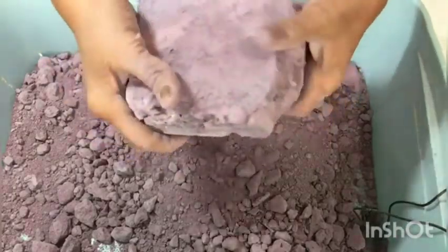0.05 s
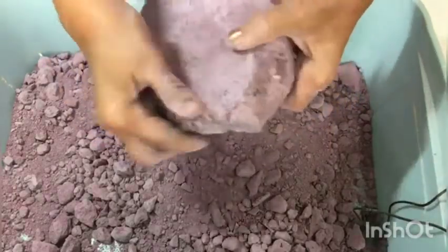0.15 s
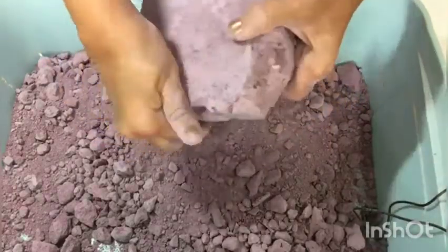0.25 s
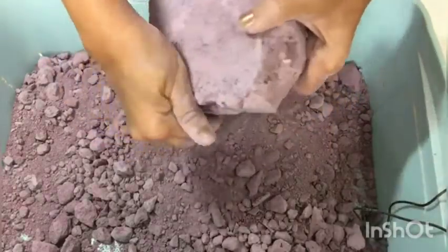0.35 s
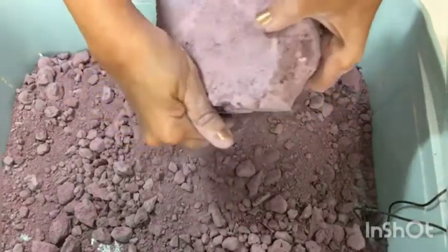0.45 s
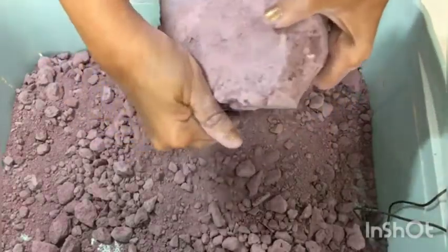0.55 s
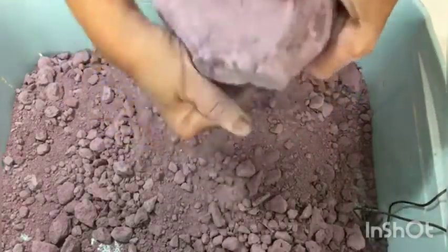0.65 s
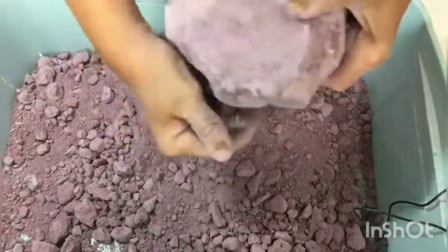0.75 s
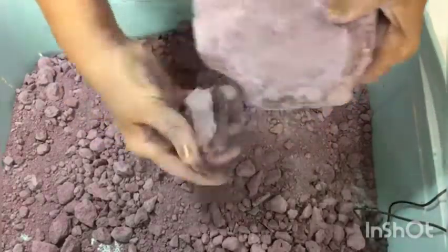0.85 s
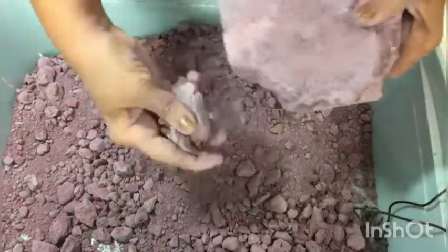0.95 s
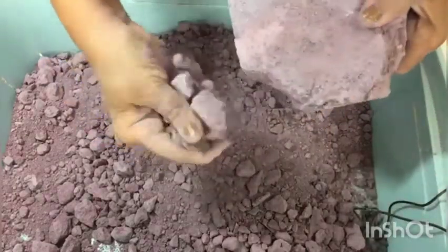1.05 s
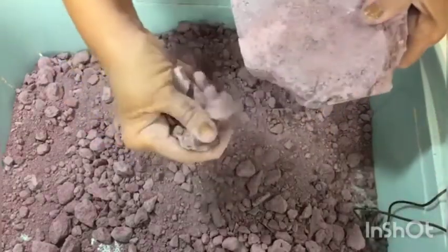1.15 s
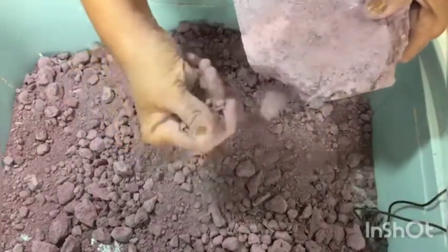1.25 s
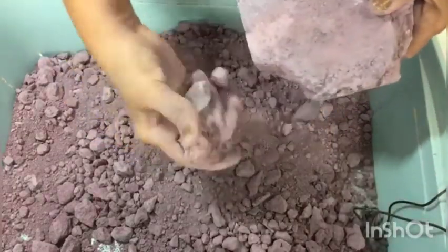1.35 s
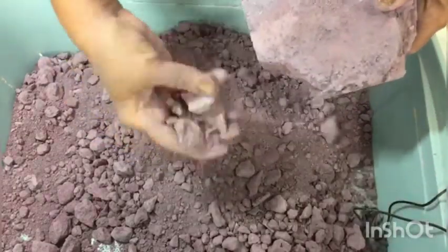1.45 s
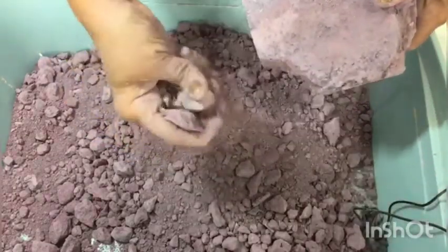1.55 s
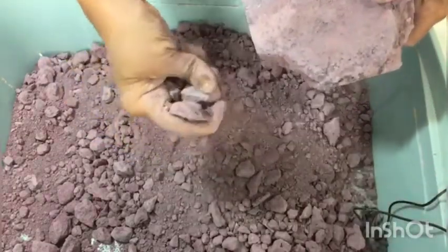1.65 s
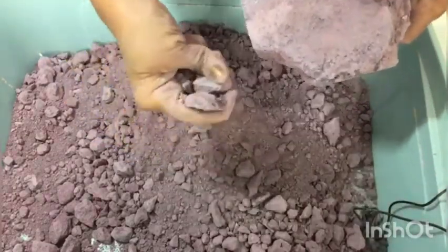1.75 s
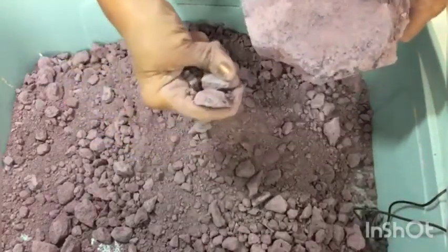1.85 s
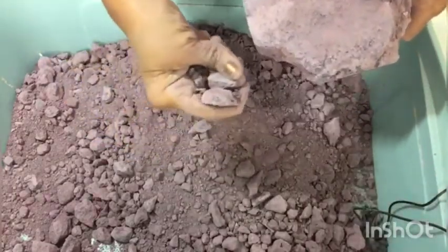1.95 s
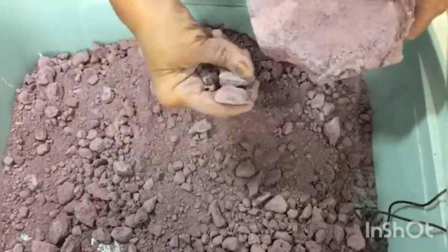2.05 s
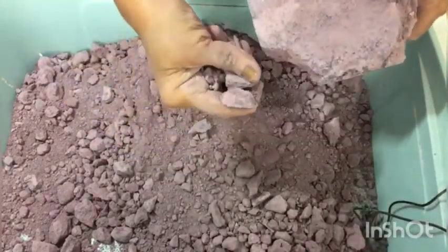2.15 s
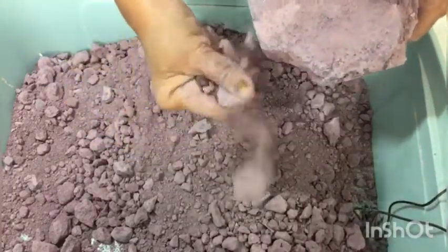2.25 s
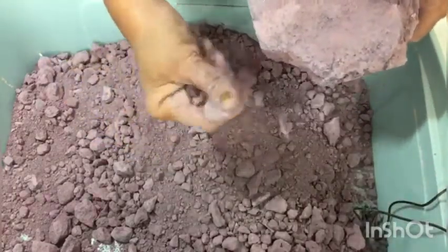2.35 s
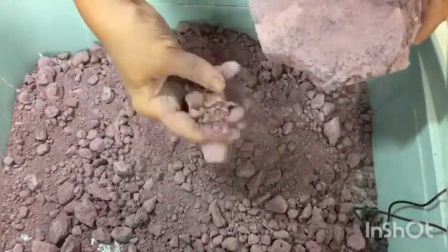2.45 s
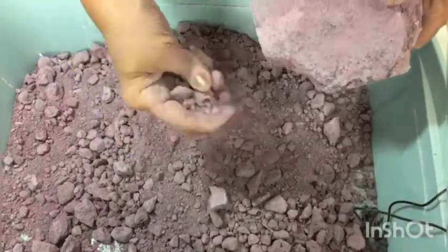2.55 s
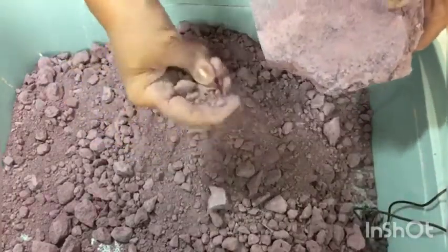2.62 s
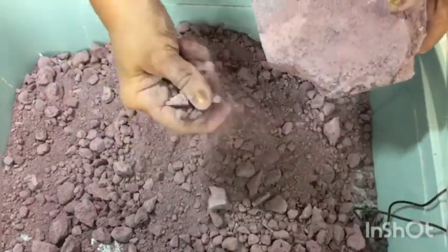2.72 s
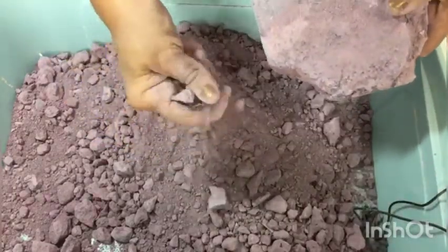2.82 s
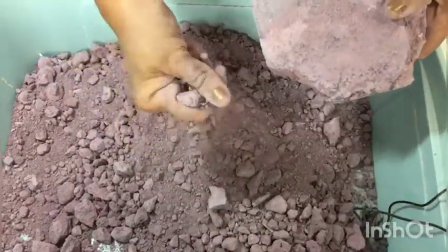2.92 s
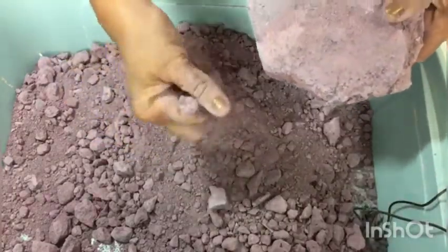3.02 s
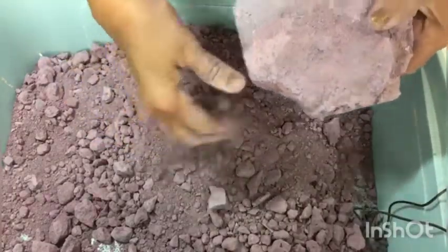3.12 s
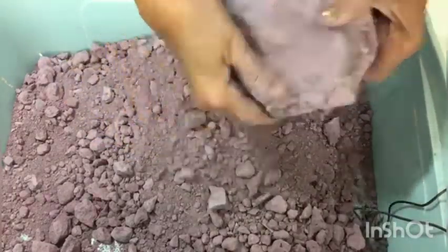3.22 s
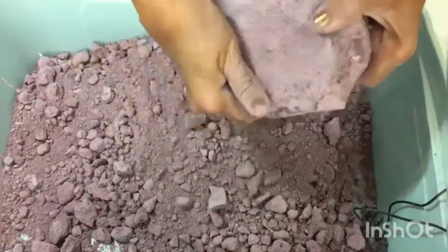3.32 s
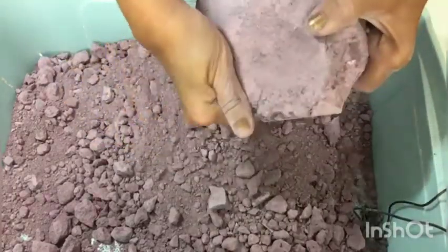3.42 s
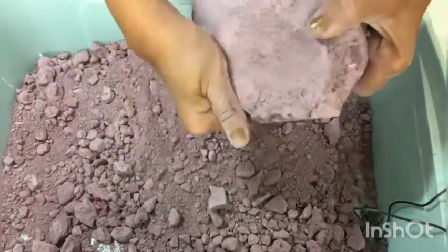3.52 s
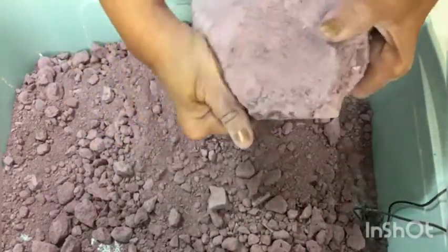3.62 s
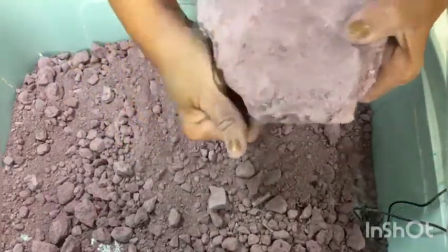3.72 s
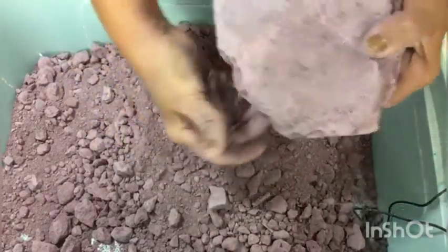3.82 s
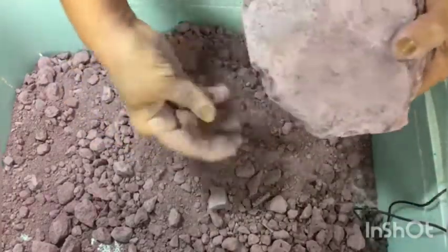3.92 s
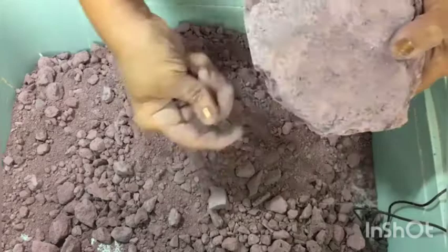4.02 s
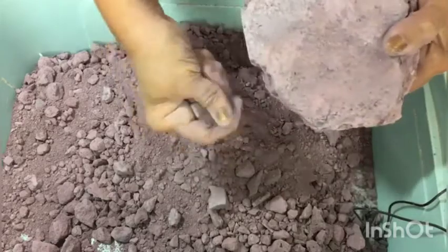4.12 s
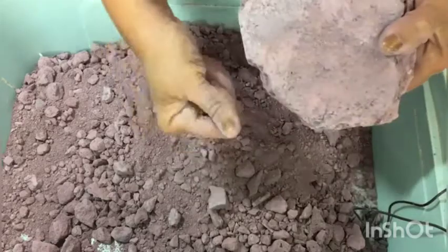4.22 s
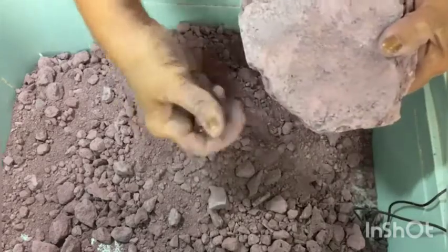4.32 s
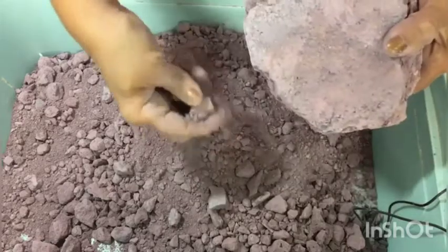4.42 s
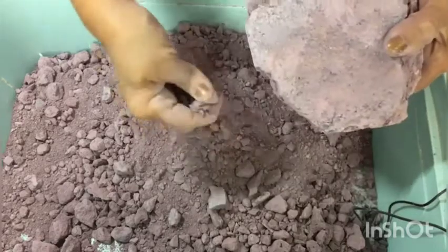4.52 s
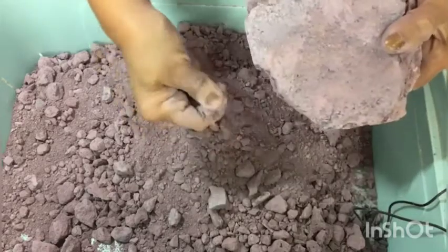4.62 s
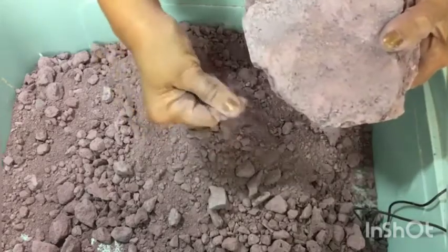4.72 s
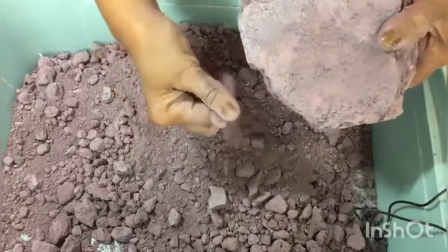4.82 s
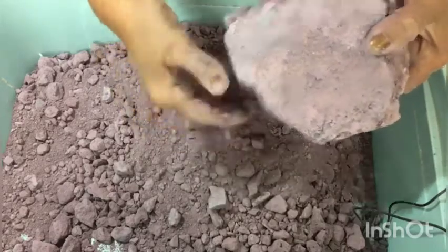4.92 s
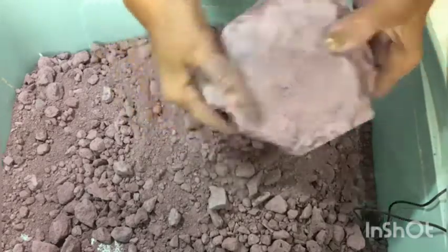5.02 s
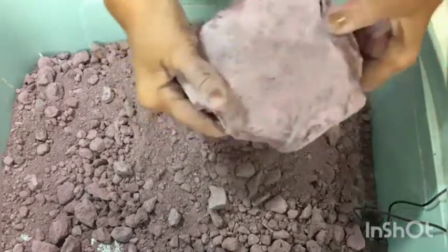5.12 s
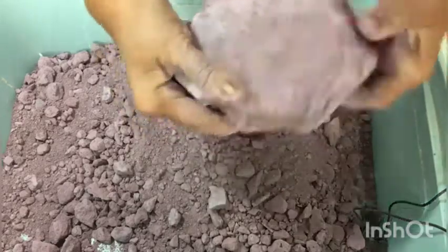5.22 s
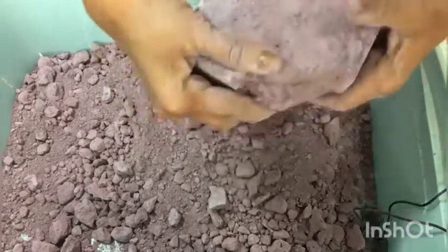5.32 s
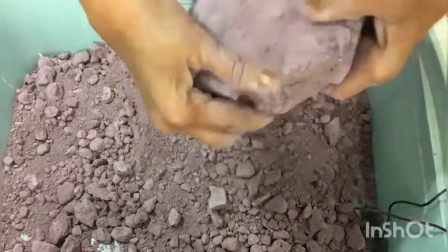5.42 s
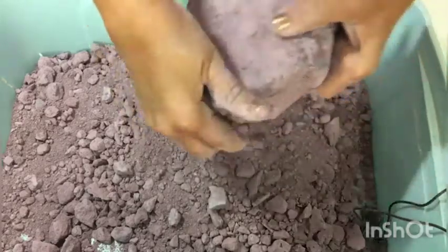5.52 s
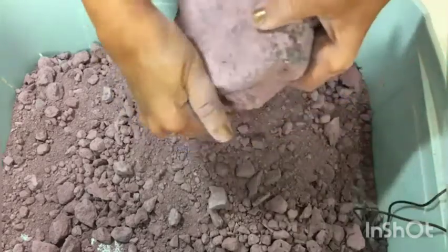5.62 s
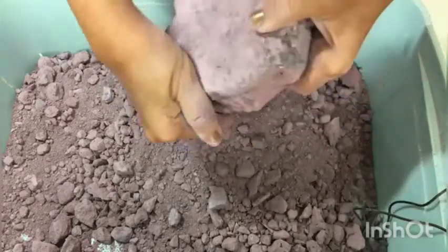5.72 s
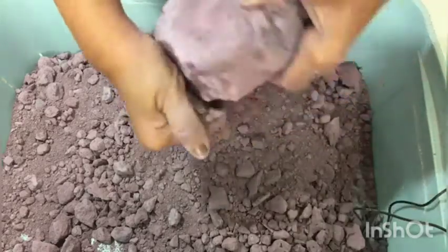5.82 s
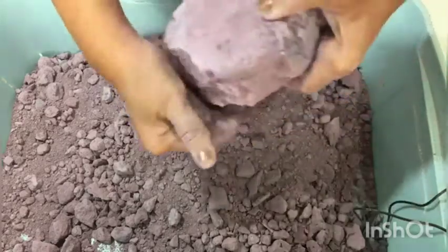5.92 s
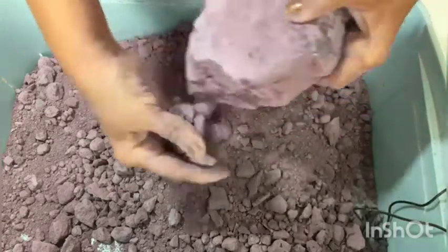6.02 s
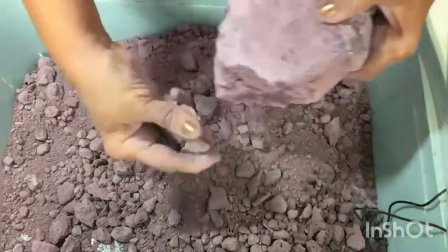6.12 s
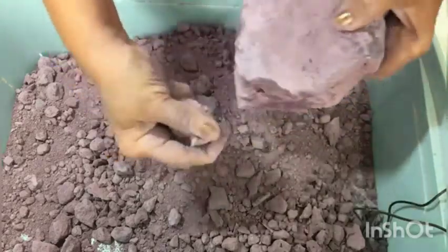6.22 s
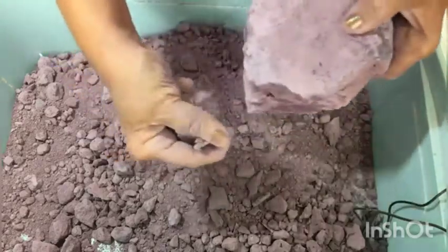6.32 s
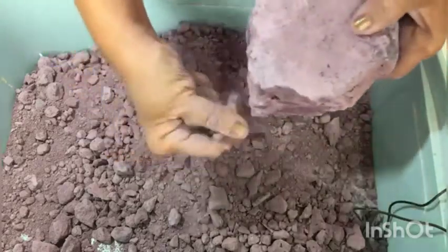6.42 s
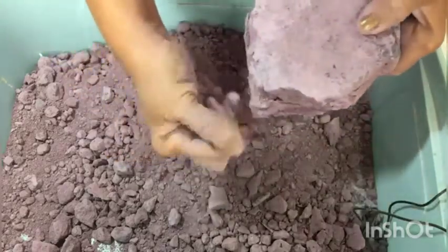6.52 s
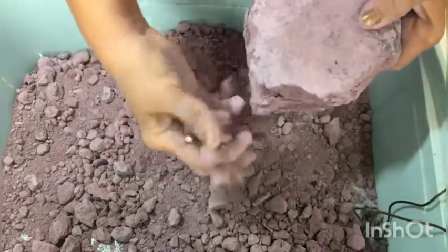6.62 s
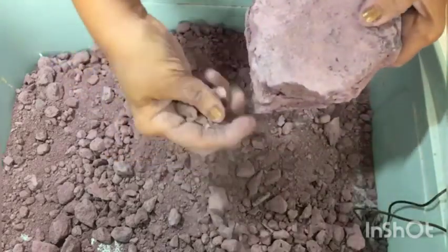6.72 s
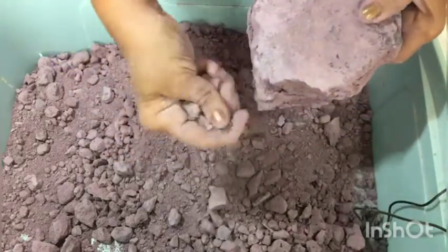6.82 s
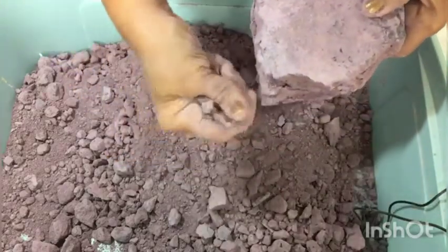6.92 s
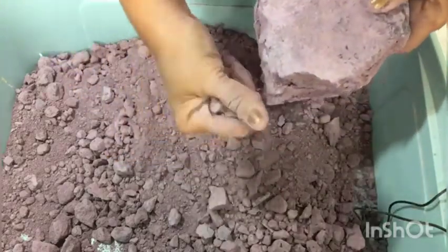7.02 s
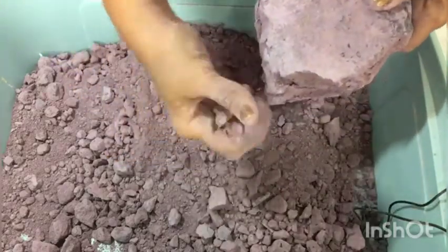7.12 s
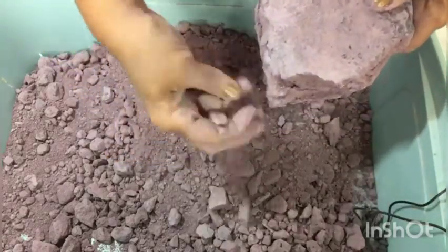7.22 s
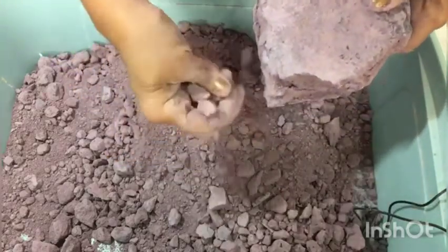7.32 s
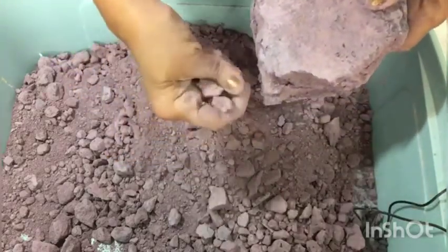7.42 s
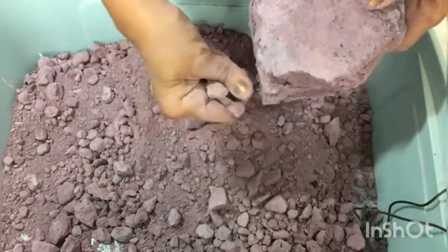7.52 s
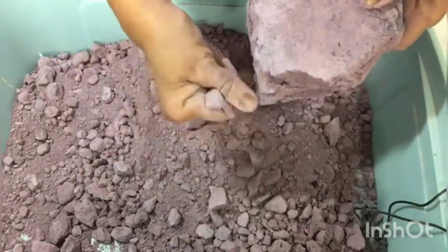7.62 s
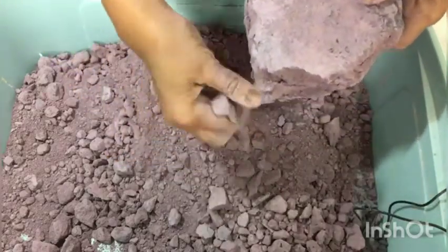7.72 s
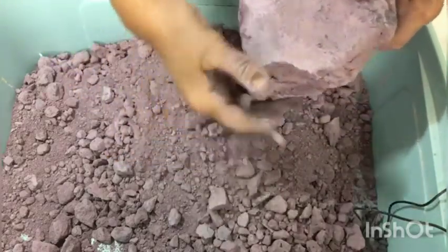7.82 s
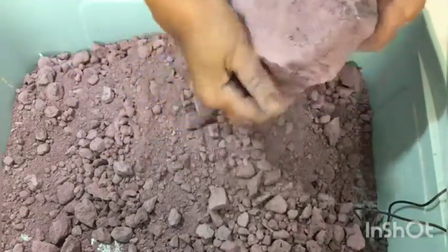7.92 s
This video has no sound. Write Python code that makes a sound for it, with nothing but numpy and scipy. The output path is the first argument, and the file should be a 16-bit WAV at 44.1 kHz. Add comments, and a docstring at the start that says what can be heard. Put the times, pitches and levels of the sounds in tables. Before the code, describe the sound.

Close, dry chalk crunching and snapping in the hands, crumbs raining into a plastic tub, with one very loud distorted lump impact at 2.3 seconds.

```python
"""Hands break and crumble a dry chalk block over a plastic tub, close to a one-microphone phone, for eight seconds.
From the start, noise grains rub and patter, and noise bursts crack and knock; lumps roll in narrow bands.
Near 2.3 s a heavy lump shocks the ringing tub and overloads the phone, and slow tub modes boom.
From 4.4 to 4.8 s a fingertip scratches a lump; cracks and crumbs go on to the end.
Throughout, the stand sways below hearing (narrow slow noise) and a quiet room hums (coloured noise)."""
import sys
import numpy as np
from scipy import signal
from scipy.fft import rfft, irfft
from scipy.io import wavfile
from scipy.ndimage import uniform_filter1d

SR = 44100
rng = np.random.default_rng(int(sys.argv[2]) if len(sys.argv) > 2 else 0)


def dump(signal):
    """Clip the signal to [-1, 1] and save it as 16-bit WAV at the path in sys.argv[1]."""
    limited = np.clip(np.atleast_2d(signal).T, -1, 1)
    pcm = np.round(limited * 32767).astype(np.int16)
    wavfile.write(sys.argv[1], SR, pcm)


N = 351036  # length in samples

# Broad resonances of the plastic tub. Each row: centre in Hz, width in Hz, relative level in dB.
TUB_BODY = [(83, 55.6, 1.5), (141, 57, 4), (223, 134, 0.5), (331.6, 242, -7.5)]


def undb(db):
    """Decibels to gain."""
    return 10 ** (np.asarray(db) / 20)


def unit(x):
    """Scaled to rms 1."""
    return x / np.sqrt(np.mean(x ** 2))


def peaked(x, db):
    """Scaled to a peak level in dB."""
    return undb(db) * x / np.abs(x).max()


def fade(t, t60):
    """Exponential decay, 60 dB in t60 seconds (never under 2 ms)."""
    return np.exp(-np.log(1000) * t / max(t60, .002))


def resonance(x, hz, width_hz):
    """Two-pole band-pass, gain 1 at the centre."""
    b, a = signal.iirpeak(hz, hz / width_hz, fs=SR)
    return signal.lfilter(b, a, x)


def steep(x, hz, width_hz):
    """A resonance applied twice, for dark flanks."""
    return resonance(resonance(x, hz, width_hz), hz, width_hz)


def body(x, modes):
    """Sum of broad resonances of alternating sign."""
    total = 0
    for k, (hz, width_hz, db) in enumerate(modes):
        total = total + (-1) ** k * undb(db) * resonance(x, hz, width_hz)
    return total


def add(out, s, sound):
    """Mixes a sound in at time s."""
    i = int(s * SR)
    out[i:i + len(sound)] += sound[:len(out) - i]


def walk(rate):
    """Random levels held 1 / rate s and slewed twice; spread near 1."""
    hold = int(SR / rate)
    steps = np.repeat(rng.standard_normal(N // hold + 1), hold)
    slewed = uniform_filter1d(uniform_filter1d(steps, hold), hold)
    return 1.25 * slewed[:N]


def grains(rate, spread_db, smear_s, patchy_db):
    """Random ticks of uneven size, rate per second, each smeared into a short noise puff; they come in patches."""
    size_db = spread_db * np.minimum(rng.exponential(size=N), 4)
    ticks = (rng.random(N) < rate / SR) * undb(size_db)
    puffs = signal.lfilter([1], [1, -np.exp(-1 / (smear_s * SR))], ticks)
    return puffs * rng.standard_normal(N) * undb(patchy_db * walk(25))


def with_bursts(steady_db, bursts):
    """Level in dB of a steady layer plus bursts (s, hold s, dB) that rise, hold and die away."""
    attack_s, release_t60_s = 0.013, 0.19
    t = np.arange(N) / SR
    power = undb(2 * steady_db)
    for s, hold, db in bursts:
        rise = np.clip((t - s) / attack_s, 0, 1)
        release = fade(np.maximum(t - s - attack_s - hold, 0), release_t60_s)
        power = power + (undb(db) * rise * release) ** 2
    return 10 * np.log10(power)


def snaps():
    """Each snap or landing: a gritty crack, the dry knock of the lump and a soft push into the tub."""
    # Each row: start in seconds, crack peak in dB, crack pitch in Hz, crack t60 in seconds,
    # knock peak in dB, knock pitch in Hz, thump peak in dB.
    snap_rows = [(0.079, -15.5, 6930, 0.36, -30, 1380, -46), (0.311, -20, 2600, 0.16, -21, 580, -35),
                 (0.3219, -14, 2440, 0.046, -15.5, 1300, -24.5), (0.416, -43, 2280, 0.031, -16, 2070, -44),
                 (0.4763, -17, 2170, 0.08, -14.5, 1260, -22), (0.5852, -9.5, 2160, 0.14, -8, 620, -11.5),
                 (0.6032, -19, 2230, .046, -15.5, 620, -21), (0.8904, -39, 6780, .046, -26.5, 670, -55),
                 (1.034, -28, 3880, 0.21, -29, 845, -36), (1.2058, -16.5, 2360, .046, -14.5, 700, -27.5),
                 (1.2872, -22, 1990, .04, -16, 1260, -30), (1.299, -14.5, 3940, 0.037, -10.5, 861, -18),
                 (1.3777, -23, 6650, 0.08, -9.5, 576, -19), (1.4204, -22.5, 4090, 0.15, -23, 755, -40),
                 (1.44, -27, 5450, 0.17, -21, 710, -26), (1.551, -22, 6710, 0.11, -46, 553, -27),
                 (1.625, -21, 6480, 0.015, -41, 495, -44), (1.722, -25.5, 1880, 0.035, -26, 640, -49),
                 (1.8827, -14.5, 5900, 0.034, -22.5, 606, -24),
                 (2.1727, -13, 5910, 0.11, -15.5, 1160, -22.5),
                 (2.2317, -32, 4700, 0.066, -24.5, 1380, -27), (2.279, 12.5, 2030, 0.067, 13, 1220, -11),
                 (2.3313, -1.5, 2060, 0.05, -6, 520, 1), (2.408, -18, 2480, .024, -26, 526, -22),
                 (2.43, -21, 2020, 0.052, -34, 664, -13), (2.4491, -23, 2000, 0.045, -0.5, 1000, -6),
                 (2.497, 3.5, 2220, 0.014, -0.5, 1170, -17), (2.5147, -12.5, 2050, 0.027, -23, 670, -10),
                 (2.5563, -40, 2090, .04, -16.5, 493, -25), (2.5695, 1.5, 3130, 0.015, -18, 1250, -28),
                 (2.6469, -17, 2120, 0.028, -9.5, 1090, -30), (2.659, -19.5, 3810, 0.1, -30, 1300, -34),
                 (2.7476, -19.5, 4170, 0.078, -23, 1820, -30), (2.823, -20.5, 3670, 0.062, -33, 506, -27),
                 (2.9878, -30, 2070, 0.046, -23.5, 1750, -45), (3.029, -24.5, 2010, 0.051, -21.5, 775, -44),
                 (3.0444, -28, 2604, 0.098, -18.5, 1360, -21.5),
                 (3.175, -21.5, 6690, 0.038, -29, 659, -27.5), (3.2117, -20, 5400, 0.033, -19, 485, -15),
                 (3.2267, -20, 3890, 0.03, -24, 880, -12), (3.264, -27, 2870, .04, -7.5, 1080, -32),
                 (3.2897, -6.5, 4400, 0.024, -9.5, 1670, -25), (3.2975, -18, 2100, 0.041, -7.5, 487, -26),
                 (3.33, -20, 5200, 0.026, -23, 506, -29), (3.3686, -21, 2010, .075, -29, 646, -28),
                 (3.4193, -29, 2030, 0.033, -17.5, 600, -23), (3.4441, -22, 2540, 0.054, -24, 478, -31),
                 (3.5088, -13.5, 2620, 0.15, -17.5, 830, -28), (3.5181, -2.5, 2240, 0.051, -32, 1360, -18),
                 (3.6396, -13, 4730, 0.19, -23, 800, -38), (4.0264, -22, 5930, 0.023, -32, 876, -37.5),
                 (4.052, -16.5, 4730, 0.014, -43, 720, -50), (4.5902, -23, 4100, .1, -35, 476, -30),
                 (4.669, -15, 3940, 0.056, -40, 528, -53), (4.783, -28, 3660, 0.087, -34.5, 1210, -32.5),
                 (4.798, -16, 1980, 0.025, -8.5, 790, -18.5), (4.9167, -26, 2150, 0.058, -25, 554, -20),
                 (4.9667, -29, 2280, 0.085, -32, 673, -23), (5.1061, -16.5, 4900, .054, -14.5, 850, -26),
                 (5.143, -22.5, 6370, 0.059, -21, 522, -42), (5.169, -43, 2120, 0.033, -13.5, 830, -44),
                 (5.2372, -31, 7000, .04, -21.5, 510, -45), (5.181, -32.5, 3820, .03, -38, 665, -48),
                 (5.2932, -23.5, 2850, 0.044, -45, 560, -50), (5.3076, -15, 5370, 0.012, -26.5, 540, -41),
                 (5.35, -10.5, 6700, 0.23, -35, 550, -26), (5.6355, -25.5, 2000, 0.049, -19, 1290, -47),
                 (5.7087, -12.5, 2450, 0.1, -32, 1290, -15), (5.7161, -0.5, 2480, 0.072, -12, 1290, -22),
                 (5.7283, -11, 2710, .029, -19, 1950, -21), (5.7502, -25, 3560, .046, -27, 791, -32),
                 (5.858, -27, 5500, 0.046, -32, 1110, -43), (6.0882, -25.5, 2120, .095, -33.5, 767, -33),
                 (6.2646, -27, 2500, 0.041, -34, 646, -40), (6.0163, -30, 2550, 0.035, -29, 584, -25),
                 (6.2281, -19, 3370, 0.021, -23.5, 1830, -44), (6.3837, -27, 4480, 0.045, -19, 610, -24),
                 (6.396, -17.5, 5610, 0.021, -16, 1000, -24), (6.4571, -19.5, 2030, 0.023, -24, 1210, -35),
                 (6.641, -23, 2020, .04, -13, 840, -19.5), (6.7004, -40.5, 2010, .035, -14.5, 1230, -13.5),
                 (6.7565, -26.5, 3750, 0.13, -28, 490, -12.5), (6.8025, -40, 2580, .04, -31.5, 900, -33),
                 (7.01, -27.5, 2700, 0.25, -31, 654, -42), (7.1697, -17, 5700, 0.011, -29.5, 674, -31),
                 (7.2348, -16.5, 2060, 0.03, -17.5, 533, -14),
                 (7.2916, -36, 2020, 0.052, -10.5, 1250, -16.5), (7.3538, -34, 2020, .04, -29, 482, -13.5),
                 (7.3915, -17, 4700, 0.033, -25, 580, -20.5), (7.4908, -27, 6670, .04, -23.5, 518, -21.5),
                 (7.5096, -26.5, 3170, .032, -32, 1370, -37), (7.5516, -25.5, 2030, 0.13, -20.5, 1320, -35),
                 (7.639, -29.5, 3490, 0.065, -24, 855, -26), (7.746, -18.5, 5750, .034, -32, 910, -27),
                 (7.788, -21.5, 2030, 0.092, -26, 1220, -33), (7.8185, -14.5, 3180, 0.09, -32, 1400, -28),
                 (7.879, -26, 4870, .069, -31, 514, -26), (7.9304, -2, 5700, 0.029, -17, 1080, -35)]
    crack_q, knock_q = 0.49, 1.5
    head_db, head_t60, rise_share = 6, 0.0047, 0.011
    knock_t60, blow_db, blow_delay_s, push_s = .035, 25, 0.00073, 0.0016
    out, t = np.zeros(N), np.arange(SR // 6) / SR
    chance = rng.standard_normal((len(snap_rows), 3, len(t)))

    push = np.sin(np.pi * np.minimum(t / push_s, 1)) ** 2
    thump = body(push * (t < push_s), TUB_BODY)
    head = undb(head_db) * fade(t, head_t60)  # the first contact is the sharpest
    blow = undb(blow_db) * (np.arange(len(t)) == int(blow_delay_s * SR))  # one-sample click
    for row, (hiss, dull, grit) in zip(snap_rows, chance):
        s, crack_db, crack_hz, t60, knock_db, knock_hz, thump_db = row
        rise = 1 - np.exp(-t / (rise_share * t60))  # long crunches also build up slowly
        # the break runs on as smaller splinters, so the tail is grainy
        tail = fade(t, t60) * undb(12.3 * uniform_filter1d(grit, size=16))
        splinters = hiss * rise * (head + tail)
        crack = steep(splinters, crack_hz, crack_hz / crack_q)
        crack = crack + 0.13 * np.diff(splinters, prepend=0)  # bright edge
        struck = blow * np.sign(dull[0]) + dull * fade(t, knock_t60)
        knock = steep(struck, knock_hz, knock_hz / knock_q)
        add(out, s, peaked(crack, crack_db) + peaked(knock, knock_db) + peaked(thump, thump_db))
    return out


def heavy_drop():
    """Each blow shocks the tub, the heap keeps shaking it, and the whole tub booms a moment later."""
    # The heavy lump and its rebounds. Each row: start in seconds, blow gain in dB.
    blows = [(2.279, 19.5), (2.288, 15), (2.298, 4.5), (2.315, 1.5)]
    # Where the loaded tub and heap answer. Each row: centre in Hz, width in Hz,
    # peak in dB before the blow gain, t60 of the shaking in seconds.
    tub_ring = [(175, 70, -11, .1), (240, 90, -9, .1), (340, 80, -7, .1), (500, 150, -10, .17),
                (850, 350, -10, .17), (1200, 450, -8, .14)]
    # Slowest tub modes, rung once. Each row: pitch in Hz, starting level in dB, t60 in seconds.
    tub_boom = [(46, -2, .6), (86, -5, .3)]
    shock_db, boom_s = 24, 2.31
    out, t = np.zeros(N), np.arange(SR // 2) / SR
    chance = rng.standard_normal((len(blows), len(t)))
    chance[:, 0] = undb(shock_db)  # the shock is the first sample
    for (s, blow_db), shaking in zip(blows, chance):
        ring = 0
        for hz, width_hz, db, t60 in tub_ring:
            ring = ring + peaked(steep(shaking * fade(t, t60), hz, width_hz), db)
        add(out, s, undb(blow_db) * ring)
    boom = sum(undb(db) * np.sin(2 * np.pi * hz * t) * fade(t, t60) for hz, db, t60 in tub_boom)
    add(out, boom_s, boom)
    return out


def rolling():
    """Quick small bumps ring whichever part of tub or heap the lump rolls or grinds over, in one narrow band."""
    # Each row: start in seconds, hold in seconds, level in dB, pitch in Hz.
    roll_rows = [(1.297, .01, -23, 94), (1.413, 0.074, -36.5, 800), (2.446, 0.022, -24.5, 1193),
                 (3.037, .03, -26, 102.5), (4.795, 0.011, -21, 109.6), (4.904, 0.11, -28, 118.3),
                 (5.107, 0.018, -35, 1094), (5.7, 0.0077, -20.5, 2570), (6.695, 0.013, -24.5, 96.6),
                 (6.754, 0.032, -25.5, 190.7), (7.232, 0.014, -28, 281), (7.283, .04, -31, 93.6)]
    roll_q = 5.6
    bumps = grains(700, spread_db=0.5, smear_s=0.0025, patchy_db=2.0)
    silent_db = np.full(N, -120.)
    total = np.zeros(N)
    for s, hold, db, hz in roll_rows:
        level_db = with_bursts(silent_db, [(s, hold, db)])
        total += undb(level_db) * unit(steep(bumps, hz, hz / roll_q))
    return total


def crumbling(grit_db, dust_db, crumb_db, drum_db):
    """Grit and dust swish between the fingers, crumbs rustle on the heap, and their rain drums the tub."""
    # Bands of the coarse grit, fine dust and heap. Each row: centre in Hz, width in Hz, relative level in dB.
    grit_bands = [(2350, 1560, 4), (3935, 490, 10)]
    dust_bands = [(4524, 1400, -1.5), (6664, 1550, -1)]
    heap_bands = [(478, 196, -2), (800, 520, -6), (1250, 165, -4), (1865, 360, -15)]
    swish = grains(2400, spread_db=3.2, smear_s=.001, patchy_db=1.6)
    ticks = grains(40, spread_db=3.5, smear_s=.0007, patchy_db=1.2)  # single dry grains let go
    rubbing = unit(swish) + undb(-5) * unit(ticks)
    rustle = grains(900, spread_db=3.3, smear_s=.0012, patchy_db=1.2)
    taps = grains(30, spread_db=3.0, smear_s=.0008, patchy_db=1.2)  # larger crumbs land one by one
    crumbs = body(unit(rustle) + undb(-6) * unit(taps), heap_bands)
    drum = body(grains(500, spread_db=2.5, smear_s=.003, patchy_db=1.2), TUB_BODY)
    grit = undb(grit_db) * unit(body(rubbing, grit_bands))
    dust = undb(dust_db) * unit(body(rubbing, dust_bands))
    return grit + dust + undb(crumb_db) * unit(crumbs) + undb(drum_db) * unit(drum)


def scratch():
    """A fingertip scratches a lump: stick-slip grit in one narrow band."""
    # Level curve. Each row: time in seconds, level in dB.
    scratch_curve = [(4.42, -68), (4.49, -39), (4.55, -57), (4.61, -45), (4.7, -40), (4.78, -39),
                     (4.81, -75)]
    s, db = np.transpose(scratch_curve)
    slips = grains(1200, spread_db=-1.0, smear_s=0.00089, patchy_db=6.5)
    slips = steep(slips, 3750, 760)
    return undb(np.interp(np.arange(N) / SR, s, db)) * unit(slips)


def sway(sway_db):
    """The stand rocks slowly as the arms move the tub and the air: noise in a band below hearing."""
    sway_hz, width_hz = 9.66, 5.9
    slow = resonance(rng.standard_normal(N), sway_hz, width_hz)
    return undb(sway_db) * unit(resonance(slow, sway_hz, 3 * width_hz))


def room():
    """Steady coloured room noise with two wavering hums of narrow-band noise."""
    # Colour of the noise. Each row: frequency in Hz, relative density in dB per Hz.
    room_colour = [(18, -38), (30, -1), (70, -22), (145, -15), (191, -26), (1020, -27), (1310, -26),
                   (1640, -39), (7500, -39)]
    # Each row: centre in Hz, width in Hz, level in dB.
    hum_rows = [(138.3, 15, -57), (227.7, 20, -54.5)]
    room_db = -46
    hz = np.maximum(np.fft.rfftfreq(N, 1 / SR), 1)
    points_hz, points_db = np.transpose(room_colour)
    colour_db = np.interp(np.log(hz), np.log(points_hz), points_db)
    hiss = irfft(rfft(rng.standard_normal(N)) * undb(colour_db), N)
    hums = sum(undb(db) * unit(resonance(rng.standard_normal(N), f, w)) for f, w, db in hum_rows)
    return undb(room_db) * unit(hiss) + hums


def scene():
    """The hands' work sets the moving levels, and all sources meet at the one microphone."""
    # Steady work of the hands. Each row: time in seconds, rubbing in dB, trickle of crumbs in dB, sway in dB.
    hand_work = [(0, -47, -51.5, -16.5), (.3, -46, -56, -20), (.4, -48, -46, -23.5),
                 (.52, -53.5, -51.5, -18.5), (.8, -45, -50, -22), (1.15, -49, -43.5, -32),
                 (1.55, -52.5, -44, -25), (1.85, -60, -60, -26), (2.2, -51.5, -46, -24),
                 (2.7, -48, -47, -25.5), (3.099, -44, -39, -29), (3.5, -49, -43, -26.5),
                 (3.8, -53, -52, -24), (4.3, -49, -46, -26.5), (4.8, -49, -49.5, -23.5),
                 (5.1, -43.5, -42, -27), (5.21, -52.5, -51, -32), (5.3, -45, -46.5, -30.5),
                 (5.9, -46.5, -47, -26.5), (6.3, -46, -46.5, -27), (6.58, -51, -43.5, -24.5),
                 (6.7, -47, -42, -23), (6.95, -47.5, -47.5, -29), (7.12, -55.5, -51.5, -24),
                 (7.3, -44.5, -43, -21), (7.96, -49, -53, -25.5)]
    # Fingers grind or wipe the chalk. Each row: start in seconds, hold in seconds, fine dust in dB,
    # coarse grit in dB.
    rubs = [(0.037, 0.074, -37, -43.5), (0.195, 0.034, -40, -37.5), (0.578, 0.031, -37.5, -37),
            (1.013, 0.11, -45, -45.5), (1.42, 0.091, -42.5, -44), (1.7, .06, -48.5, -62),
            (2.3, 0.11, -38.5, -38), (2.482, 0.15, -45, -40.5), (2.812, 0.13, -45.5, -44.5),
            (3.263, .11, -40.5, -43), (3.539, 0.11, -36.5, -36.5), (3.84, 0.026, -48.5, -56),
            (4.016, 0.16, -43.5, -42.5), (4.954, 0.038, -44.5, -46), (5.273, 0.052, -43, -49),
            (5.365, 0.13, -42.5, -43.5), (5.697, 0.024, -25.5, -26), (6.22, 0.064, -52, -47),
            (6.442, 0.043, -42.5, -40.5), (7.535, 0.057, -46, -60), (7.848, 0.12, -40, -43.5)]
    # Handfuls of crumbs fall on the heap. Each row: start in seconds, hold in seconds, patter in dB,
    # tub drumming in dB.
    showers = [(0.454, 0.027, -38, -38), (0.577, 0.027, -35, -54), (.87, 0.072, -43.5, -36),
               (1.181, 0.14, -40, -43), (1.3, 0.056, -44, -31.5), (1.39, 0.066, -34, -27.5),
               (1.69, 0.038, -42, -38.5), (2.323, 0.075, -21, -33), (2.437, 0.07, -21, -27),
               (2.543, 0.11, -36, -35.5), (2.819, 0.023, -38, -42), (3.03, .14, -43, -38),
               (3.216, 0.095, -28.5, -27.5), (3.336, 0.074, -36, -36), (3.591, 0.062, -38.5, -39),
               (3.849, 0.06, -43.5, -35.5), (4.12, 0.034, -37.5, -35.5), (4.36, .06, -57, -34),
               (4.815, 0.23, -41.5, -36.5), (5.076, 0.17, -40.5, -40), (5.32, .07, -38.5, -38),
               (5.697, .05, -31.5, -38), (6.02, 0.06, -43, -34), (6.363, 0.12, -52, -35.5),
               (6.66, 0.076, -36.5, -32), (6.78, 0.13, -50.5, -38.5), (7.217, 0.16, -41, -35.5),
               (7.562, 0.11, -49, -35), (7.748, 0.057, -37, -34.5), (7.867, 0.049, -39.5, -26)]
    # The stand is jolted. Each row: start in seconds, hold in seconds, sway in dB.
    jolts = [(0.585, .05, -14.5), (2.27, .04, -8), (2.67, .05, -23.5), (3.198, .06, -17), (3.465, .05, -24),
             (4.024, .04, -22.5), (5.296, .04, -16.5), (5.71, .05, -18.5), (6.544, .05, -26.5),
             (7.855, .05, -18)]
    grit_offset_db, drum_offset_db = -1.5, -1  # grit against steady rubbing, drumming against trickle

    s, *columns = np.transpose(hand_work)
    rub_db, trickle_db, sway_db = (np.interp(np.arange(N) / SR, s, c) for c in columns)
    dust_db = with_bursts(rub_db, [(s, hold, dust) for s, hold, dust, grit in rubs])
    grit_db = with_bursts(rub_db + grit_offset_db, [(s, hold, grit) for s, hold, dust, grit in rubs])
    crumb_db = with_bursts(trickle_db, [(s, hold, patter) for s, hold, patter, drum in showers])
    drum_db = with_bursts(trickle_db + drum_offset_db, [(s, hold, drum) for s, hold, patter, drum in showers])

    chalk = snaps() + heavy_drop() + rolling() + crumbling(grit_db, dust_db, crumb_db, drum_db) + scratch()
    mono = chalk + sway(with_bursts(sway_db, jolts)) + room()
    return np.array([mono, mono])


def record(dry):
    """A narrow microphone band, hard overload that spills above it, and the final cut."""
    band_hz, top_hz = 7030, 16100
    microphone = signal.ellip(10, .3, 75, band_hz, fs=SR, output="sos")
    final_cut = signal.ellip(8, .2, 60, top_hz, fs=SR, output="sos")
    narrow = signal.sosfilt(microphone, dry)
    clipped = np.clip(narrow, -.97, .97)
    return np.clip(signal.sosfilt(final_cut, clipped), -1, 1)


dry = scene()
out = record(dry)
dump(out)
```